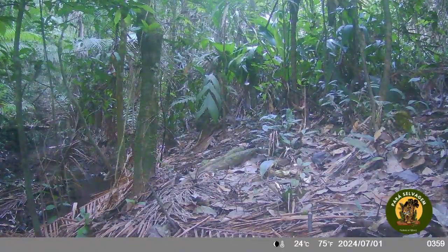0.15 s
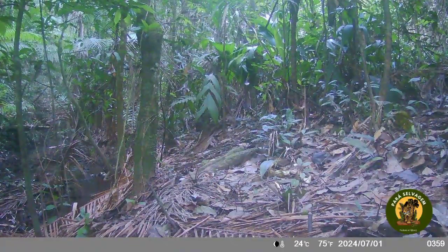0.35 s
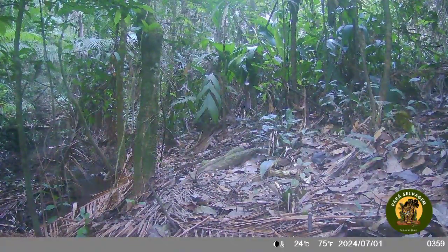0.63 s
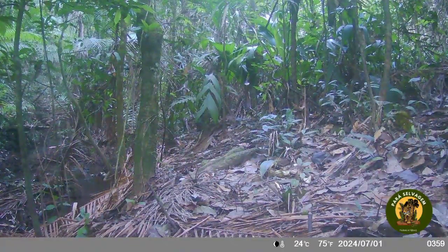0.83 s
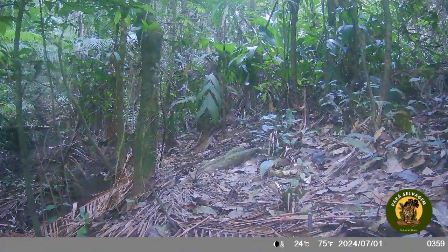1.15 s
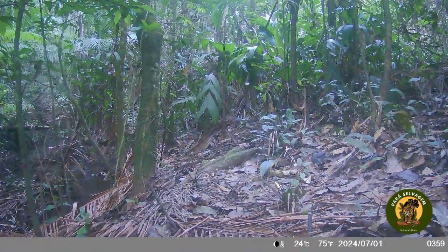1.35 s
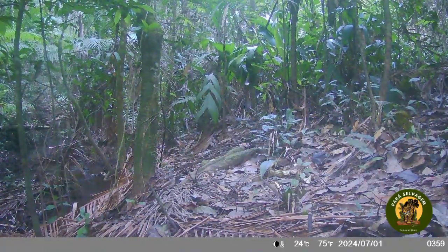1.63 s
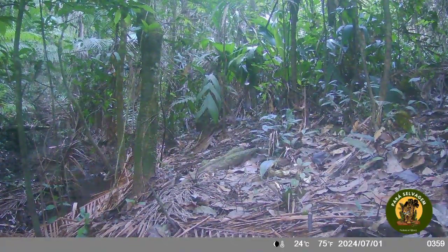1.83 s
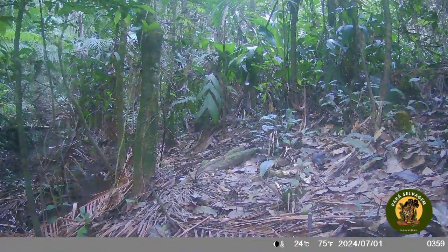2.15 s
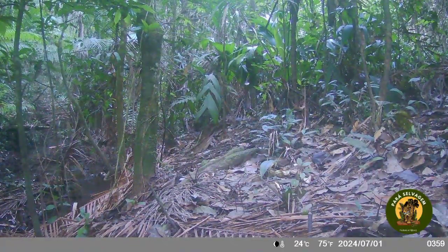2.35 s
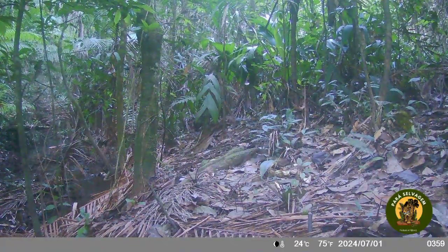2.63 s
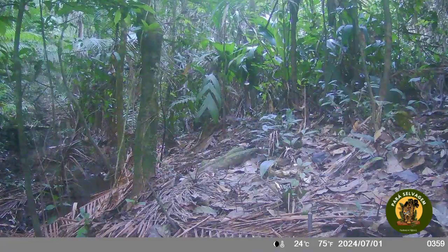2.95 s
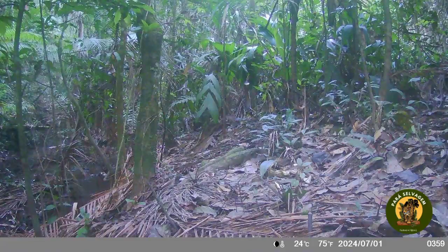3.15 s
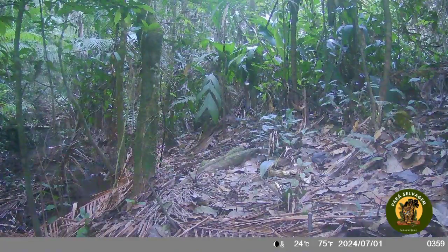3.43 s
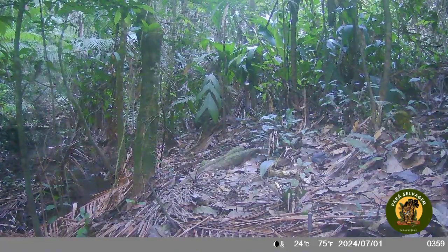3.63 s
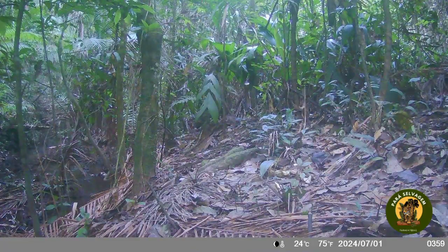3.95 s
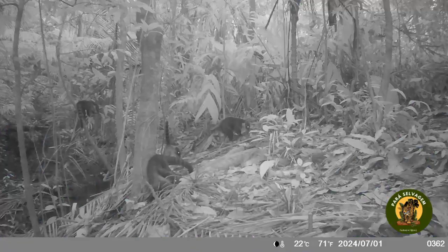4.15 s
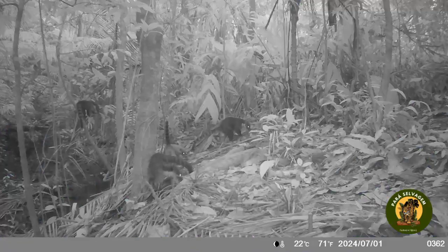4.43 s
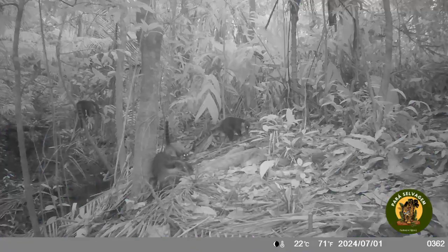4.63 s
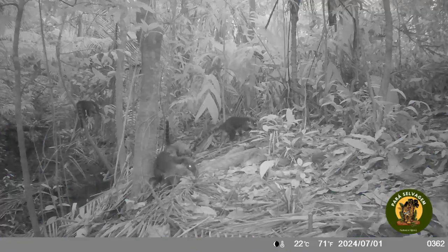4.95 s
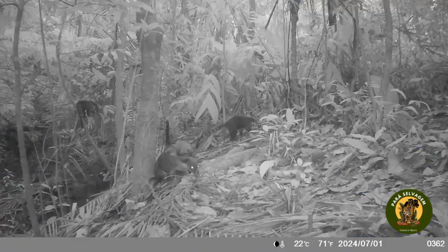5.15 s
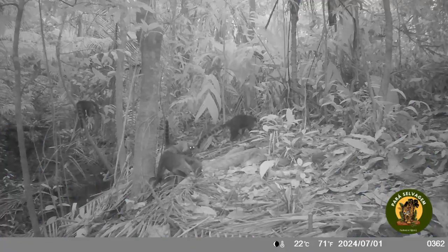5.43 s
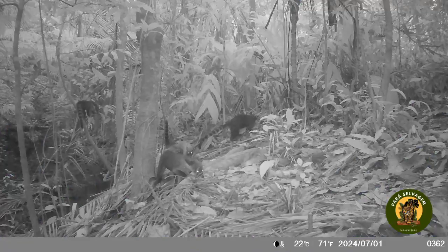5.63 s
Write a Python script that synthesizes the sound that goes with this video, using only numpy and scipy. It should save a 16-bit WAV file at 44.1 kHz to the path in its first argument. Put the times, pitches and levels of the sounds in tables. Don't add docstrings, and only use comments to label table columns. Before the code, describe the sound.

Pulsing cricket trills over steady hiss in a rainforest, with hoarse sweeping animal calls, thin whistles and a twig snap; the near crickets stop abruptly.

```python
import sys
import numpy as np
from scipy import signal
from scipy.fft import rfft, irfft
from scipy.io import wavfile

SR = 44100
rng = np.random.default_rng(int(sys.argv[2]) if len(sys.argv) > 2 else 0)


def natural_amplitude(level_db):
    exponent = np.asarray(level_db, float) / 20
    return 10 ** exponent


def store_pcm(level_fs):
    pcm = np.round(np.clip(level_fs, -1, 1) * 32767).astype(np.int16)
    wavfile.write(sys.argv[1], SR, np.atleast_2d(pcm).T)


N = 255780
T = np.arange(N) / SR

# (first pulse [s], pulses [count], level [dB])
LOW_TRILLS = [
    (.178, 15, -37.0),
    (.941, 15, -36.8),
    (1.723, 14, -37.0),
    (2.458, 14, -36.8),
    (3.207, 15, -37.8),
    (3.973, 6, -37.5),
]
# (first pulse [s], pulses [count], level [dB])
HIGH_TRILLS = [
    (.323, 24, -45.0),
    (1.147, 25, -45.5),
    (1.973, 26, -45.0),
    (2.828, 26, -45.5),
    (3.651, 21, -45.0),
]
# (start [s], length [s], first pitch [Hz], last pitch [Hz], peak [dB])
RASPS = [
    (0.246, 0.31, 2920, 1900, -50),
    (1.897, 0.18, 3200, 3350, -42.5),
    (2.9, 0.3, 2300, 2900, -50),
    (3.395, 0.48, 2010, 3570, -42.5),
    (3.52, 0.26, 4000, 4600, -58),
    (3.83, 0.41, 3200, 1900, -43.5),
    (5.083, 0.37, 2000, 3310, -44.5),
    (5.16, 0.42, 4300, 4600, -52),
    (5.664, .5, 2030, 3600, -48),
]
# (start [s], length [s], pitch [Hz], level [dB])
WHISTLES = [
    (.08, .14, 5910, -61.0),
    (2.27, .14, 3570, -55.0),
    (3.665, .04, 5060, -48.0),
    (3.695, .055, 5200, -49.0),
    (3.745, .05, 5065, -47.0),
    (3.825, .04, 5060, -52.0),
    (3.875, .12, 5062, -45.0),
    (4.54, .30, 4020, -62.0),
    (5.11, .11, 4860, -51.0),
]
# (time [s], peak [dB], pitch [Hz], length [s])
PIPS = [
    (.184, -44.0, 4880, .014),
    (4.2752, -34.0, 4450, .0045),
    (5.274, -36.5, 4400, .007),
    (5.783, -48.0, 4050, .010),
    (2.103, -44.0, 500, .014),
    (1.955, -49.0, 3350, .03),
    (3.51, -46.0, 3150, .04),
    (3.935, -46.0, 2550, .025),
]
# (time [s], peak [dB], centre [Hz], time to fall 60 dB [s])
CRACKS = [
    (1.814, -30.0, 4050, .05),
    (1.814, -36.0, 5500, .025),
    (1.820, -33.0, 5350, .05),
    (1.818, -41.5, 2900, .04),
    (1.827, -38.0, 3500, .04),
    (1.826, -35.5, 4400, .07),
    (1.815, -43.0, 700, .04),
    (4.07, -46.0, 6800, .2),
]
# (middle [s], length [s], gain [dB])
SWELLS = [(0.153, .26, 6.0), (.66, .34, 4), (1.262, .4, 3.5), (1.659, .2, 3.5), (1.947, .2, 3.5),
          (2.549, .5, 5.0), (3.061, .26, 3.5), (3.382, .2, 3.0), (3.741, .26, 6), (3.951, .2, 3.5),
          (4.3, .4, 3.5), (4.601, 0.35, 3.5), (4.878, .14, 4), (5.052, .2, 5.5), (5.198, .2, 3.0),
          (5.404, 0.301, 3.5), (5.62, 0.27, 5.0), (5.778, .2, 5)]
# (frequency [Hz], level [dB per Hz])
HISS = [(12, -62.5), (30, -51.5), (100, -58.5), (250, -63.5), (500, -66.5), (1000, -69), (2000, -71.5),
        (3500, -72.5), (5700, -74.5), (7000, -76)]
# (time [s], height [full scale])
TICKS = [
    (.6974, -.046),
    (1.7291, -.044),
    (2.7295, -.03),
    (3.7612, -.04),
    (4.27415, .046),
    (5.2746, .036),
]
# (frequency [Hz], gain [dB])
HISS_TOP = [(6900, -1), (7500, -5), (8000, -10.5), (8500, -20), (9000, -36.5), (9600, -54)]
# (time [s], offset [full scale])
OFFSET = [(0, .2388), (4.045, .2388), (4.06, .229), (4.09, .251), (4.15, .2545), (4.5, .251), (5.8, .249)]

CUT_S, RETURN_S = 4.051962, 4.052132
RASP_ATTACK_S, RASP_RELEASE_S, RASP_FADE_DB = 0.07, 0.11, 8
NARROW_OCT, WIDE_OCT, GLIDE_BEND = .12, 0.43, 0.53
WHISTLE_FADE_S = .015
CHORUS_DB, CHORUS_HZ, RISE_HZ_PER_DB = -52.5, 4970, 15.5
SECOND_SCENE_HZ, SECOND_SCENE_DB = 89.6, 0.5
SHIMMER_HZ, SHIMMER_WIDTH_HZ, SHIMMER_DB, SHIMMER_FADE_DB_PER_S = 6700, 1500, -57.5, 2
HISS_DB, ROUNDING_DB = -40.5, -79


def rms_one(x):
    return x / np.sqrt(np.mean(np.abs(x) ** 2) + 1e-20)


def drift(rate):
    r = np.exp(-80 * np.pi * rate / SR)
    slow = signal.lfilter([1], [1, -2 * r, r * r], rng.standard_normal(N // 40 + 2002))[2000:]
    return np.interp(np.arange(N) / 40, np.arange(len(slow)), rms_one(slow))


def resonate(x, hz, width_hz):
    r = np.exp(-np.pi * width_hz / SR)
    feed = np.array([1, 0, -1]) * (1 - r * r) / 2
    return signal.lfilter(feed, [1, -2 * r * np.cos(2 * np.pi * hz / SR), r * r], x)


def coloured(x, points):
    hz = np.fft.rfftfreq(N, 1 / SR) + 1
    at, db = np.transpose(points)
    gain = natural_amplitude(np.interp(np.log(hz), np.log(at), db)) * (hz > 10)
    return irfft(rfft(x) * gain, N)


def add(out, s, piece):
    i = round(s * SR)
    out[i:i + len(piece)] += piece[:N - i]


def pip(hz, length_s, fall=0., phase=0., round_top=0.58):
    part = np.arange(int(length_s * SR)) / SR / length_s
    pitch = hz * (1 + fall * (.25 - part ** 2))
    hump = np.sin(np.pi * part) ** round_top
    return hump * np.sin(phase + 2 * np.pi * np.cumsum(pitch) / SR)


def cricket(trills, period_s, stroke_s, hz, fall, warm_pulses, warm_db, jitter_s, uneven_db, wobble=0.39):
    out = np.zeros(N)
    for start, count, level_db in trills:
        luck = rng.standard_normal((30, 4))
        for k in range(count):
            db = level_db + (k < warm_pulses) * warm_db + uneven_db * luck[k, 0]
            pitch = hz * (1 + .0015 * luck[k, 1])
            stroke = pip(pitch, stroke_s, fall, phase=wobble * luck[k, 3], round_top=.55)
            start_s = start + k * period_s - stroke_s / 2 + jitter_s * luck[k, 2]
            add(out, start_s, natural_amplitude(db) * stroke)
    return out


def foliage(x, wet_db, t60):
    t = np.arange(int(.15 * SR)) / SR
    tail = rng.standard_normal(len(t)) * natural_amplitude(-60 * t / t60) * np.minimum(t / .003, 1)
    tail = tail / np.sqrt(np.sum(tail ** 2))
    return x + natural_amplitude(wet_db) * signal.fftconvolve(x, tail)[:N]


def rasps(grain_db):
    breath_noise = rng.standard_normal(N) * natural_amplitude(grain_db * drift(47.0))
    _, s, frames = signal.stft(breath_noise, SR, nperseg=512)
    octaves = np.log2(np.fft.rfftfreq(512, 1 / SR) + 1)[:, None]
    gain = 0
    for start, length_s, first_hz, last_hz, db in RASPS:
        part = np.clip((s - start) / length_s, 0, 1)
        centre = np.log2(first_hz) + np.log2(last_hz / first_hz) * part ** GLIDE_BEND
        spread = NARROW_OCT + (WIDE_OCT - NARROW_OCT) * np.sin(np.pi * part)
        throat = np.exp(-.1 * np.abs((octaves - centre) / np.clip(spread, .08, .5)) ** 3)
        throat = throat / np.sqrt(np.mean(throat ** 2, axis=0))
        attack = (s - start) / RASP_ATTACK_S
        release = (start + length_s - s) / RASP_RELEASE_S
        breath = np.clip(np.minimum(attack, release), 0, 1)
        heard = (s < CUT_S) | (start > CUT_S)
        gain = gain + throat * breath * natural_amplitude(db - RASP_FADE_DB * part) * heard
    return signal.istft(frames * gain, SR, nperseg=512)[1][:N]


def whistles():
    out = np.zeros(N)
    waver_db, waver_hz = 3.0 * drift(45.0), 25 * drift(50.0)
    for s, length_s, hz, db in WHISTLES:
        fade = np.clip(np.minimum(T - s, s + length_s - T) / WHISTLE_FADE_S, 0, 1)
        tone = np.sqrt(2) * np.sin(2 * np.pi * np.cumsum(hz + waver_hz) / SR)
        out += natural_amplitude(db - 3.0 + waver_db) * fade * tone
    for s, db, hz, length_s in PIPS:
        add(out, s, natural_amplitude(db) * pip(hz, length_s))
    return out


def twig():
    out, t = np.zeros(N), np.arange(4000) / SR
    for s, db, hz, t60 in CRACKS:
        puff = resonate(rng.standard_normal(len(t)), hz, .22 * hz)
        puff = rms_one(resonate(puff, hz, .22 * hz))
        add(out, s, natural_amplitude(db - 2.0 - 60 * t / t60) * np.minimum(t / 0.0011, 1) * puff)
    return out


def chorus(spread_hz, swell_db):
    effort_db = np.zeros(N)
    for s, length_s, db in SWELLS:
        effort_db += db * np.cos(np.pi * np.clip((T - s) / length_s, -.5, .5)) ** 2
    second = T > RETURN_S
    centre_hz = CHORUS_HZ + RISE_HZ_PER_DB * effort_db + SECOND_SCENE_HZ * second
    out = np.zeros(N)
    for place in np.linspace(-1.7, 1, num=19):
        beat = np.cumsum(rng.uniform(35, 70) * (1 + 0.0301 * drift(1.87))) / SR
        loudness = natural_amplitude(swell_db * drift(5.0) - 1.7 * place ** 2)
        strokes = np.maximum(np.sin(2 * np.pi * beat), 0) * loudness
        pitch = centre_hz + spread_hz * place + 60 * drift(4.0) + 80 * drift(60.0)
        out += strokes * np.sin(2 * np.pi * np.cumsum(pitch) / SR)
    return natural_amplitude(CHORUS_DB + effort_db + SECOND_SCENE_DB * second) * rms_one(out)


def shimmer():
    haze = resonate(rng.standard_normal(N), SHIMMER_HZ, SHIMMER_WIDTH_HZ)
    haze = rms_one(resonate(haze, SHIMMER_HZ, SHIMMER_WIDTH_HZ))
    level_db = SHIMMER_DB - SHIMMER_FADE_DB_PER_S * (T - RETURN_S)
    return (T > RETURN_S) * natural_amplitude(level_db) * haze


def hiss():
    swell_db = .25 * drift(2.0)
    return natural_amplitude(HISS_DB + swell_db) * rms_one(coloured(rng.standard_normal(N), HISS))


def camera_ticks():
    return sum(height * np.exp(-.5 * ((T - s) / .000055) ** 2) for s, height in TICKS)


def scene():
    low = cricket(LOW_TRILLS, period_s=.01536, stroke_s=.0043, hz=4490, fall=.03,
                  warm_pulses=4, warm_db=-3.5, jitter_s=.0002, uneven_db=.8)
    high = cricket(HIGH_TRILLS, period_s=.0196, stroke_s=.012, hz=6528, fall=.016,
                   warm_pulses=1, warm_db=-4.5, jitter_s=.0006, uneven_db=1.5)
    near = foliage(natural_amplitude(-1.0) * low, wet_db=-13.0, t60=.08) + foliage(high, wet_db=-7.0, t60=.1)
    calls = rasps(grain_db=0.9) + foliage(whistles() + twig(), wet_db=-9.0, t60=0.1)
    forest = near * (T < CUT_S) + chorus(spread_hz=300, swell_db=-2.0) + calls + shimmer()
    return (forest + hiss() + camera_ticks())[None]


def top_cut(x):
    return signal.sosfilt(signal.butter(12, 15750, fs=SR, output="sos"), x)


def record(dry):
    fall_s, rise_s = .9 / SR, 3.0 / SR
    mute = np.clip(np.minimum((T - CUT_S) / fall_s, (RETURN_S - T) / rise_s) + .5, 0, 1)
    offset_s, offset_height = np.transpose(OFFSET)
    offset = np.interp(T, offset_s, offset_height)
    scenes = (coloured(dry[0], HISS_TOP) + offset) * (1 - mute)
    rounding = natural_amplitude(ROUNDING_DB) * rng.standard_normal(N)
    return top_cut((scenes + rounding)[None])


dry = scene()
out = record(dry)
store_pcm(out)
```